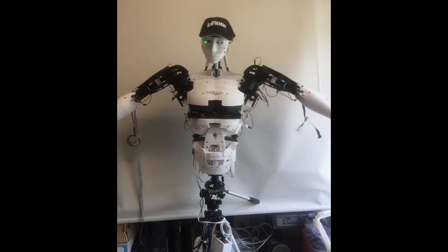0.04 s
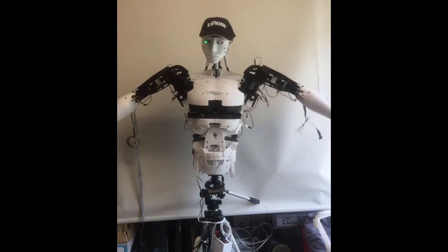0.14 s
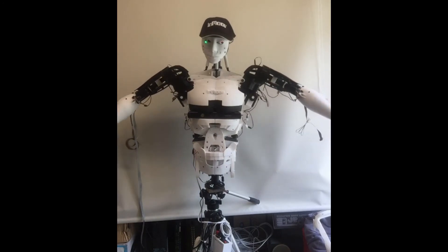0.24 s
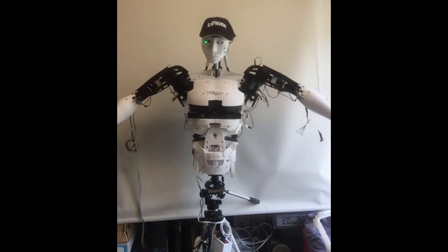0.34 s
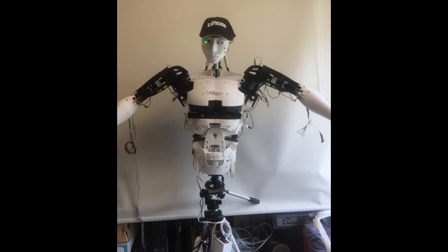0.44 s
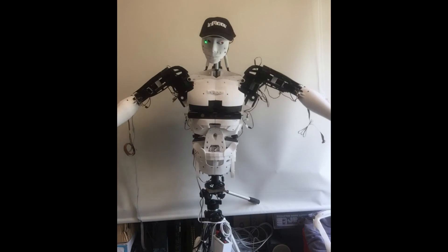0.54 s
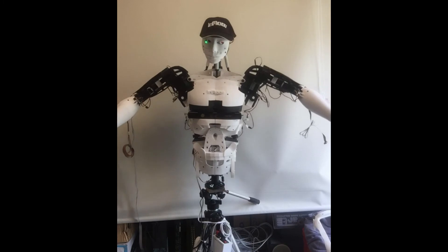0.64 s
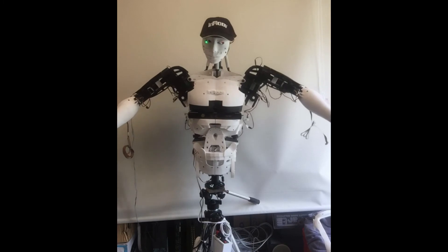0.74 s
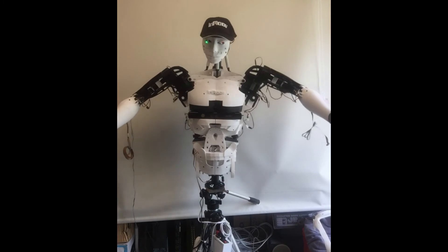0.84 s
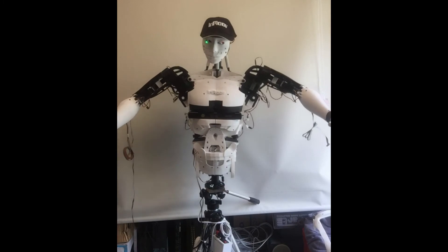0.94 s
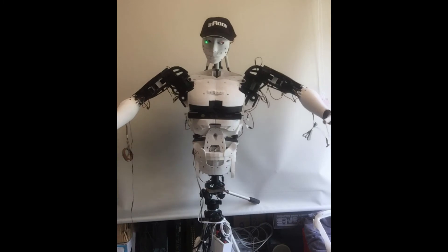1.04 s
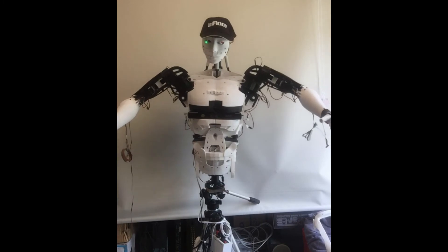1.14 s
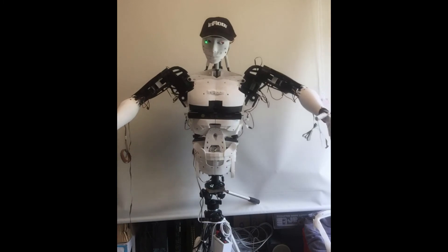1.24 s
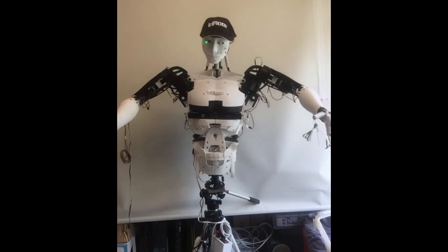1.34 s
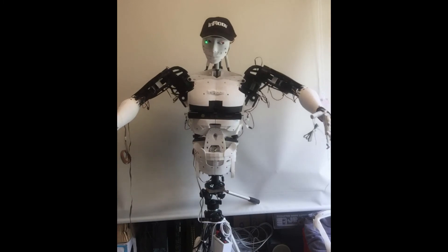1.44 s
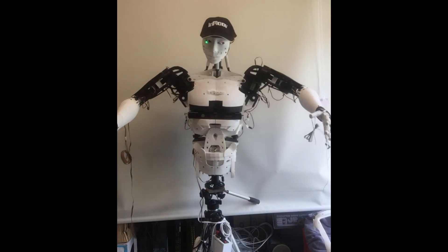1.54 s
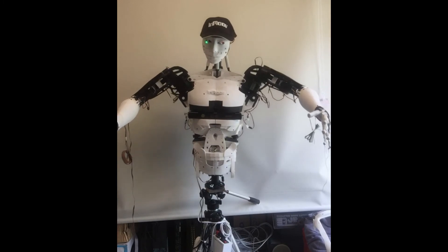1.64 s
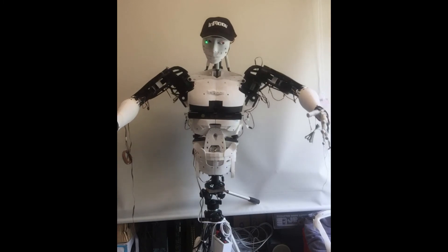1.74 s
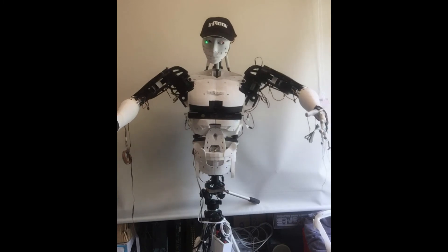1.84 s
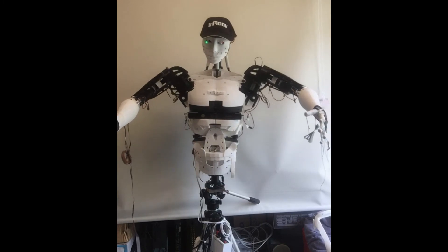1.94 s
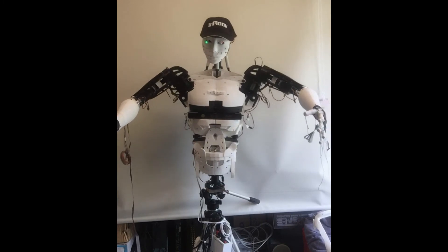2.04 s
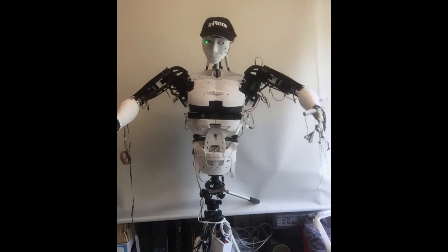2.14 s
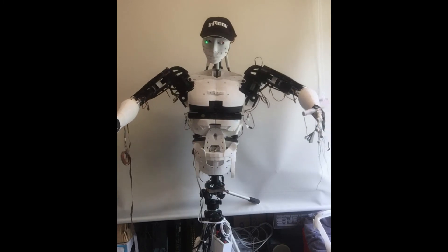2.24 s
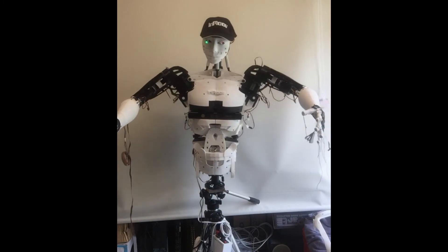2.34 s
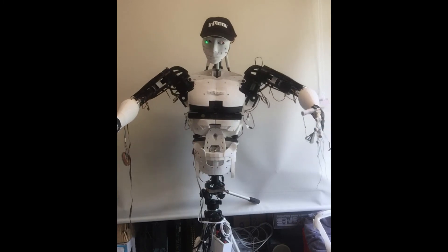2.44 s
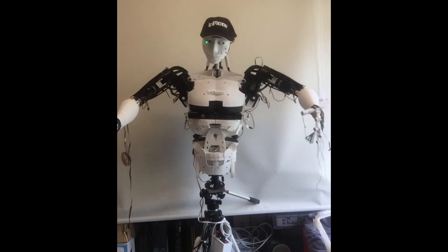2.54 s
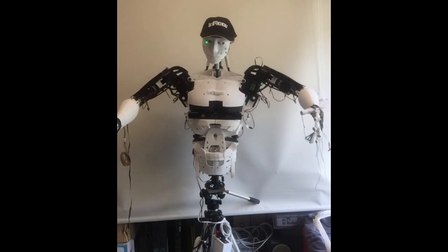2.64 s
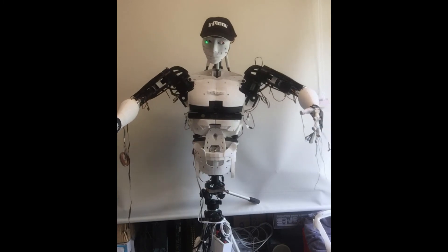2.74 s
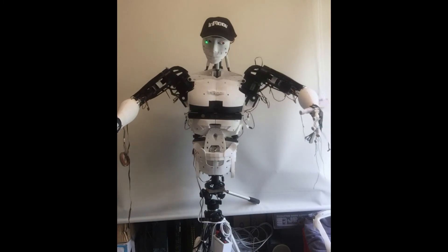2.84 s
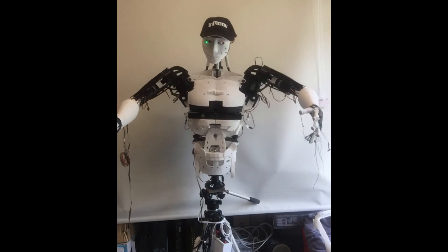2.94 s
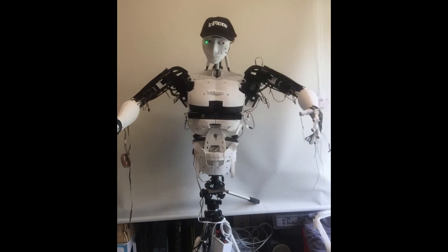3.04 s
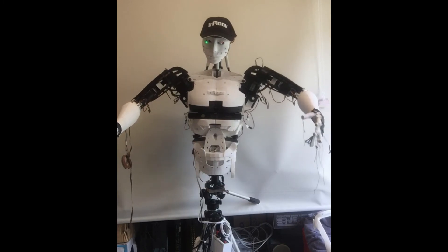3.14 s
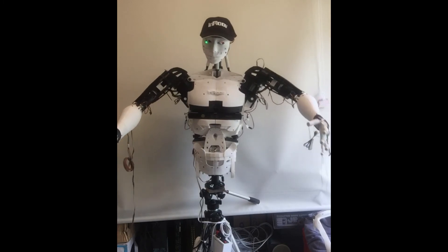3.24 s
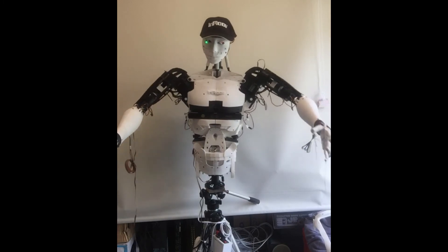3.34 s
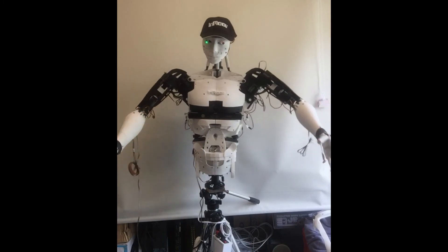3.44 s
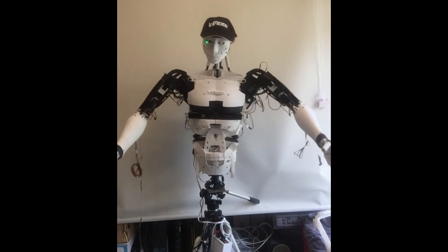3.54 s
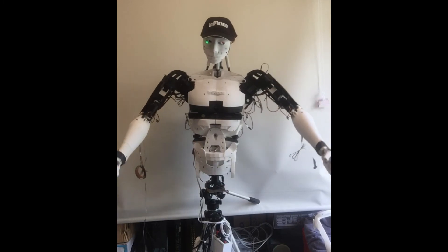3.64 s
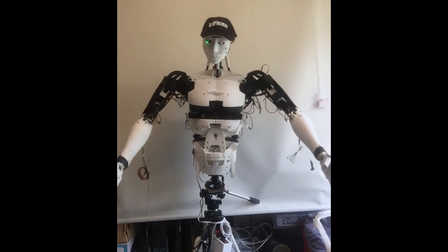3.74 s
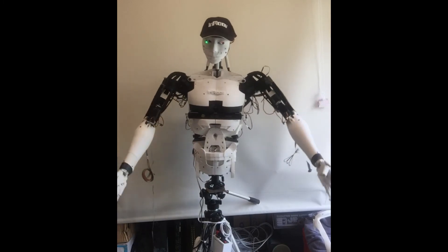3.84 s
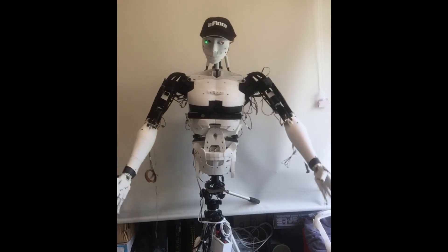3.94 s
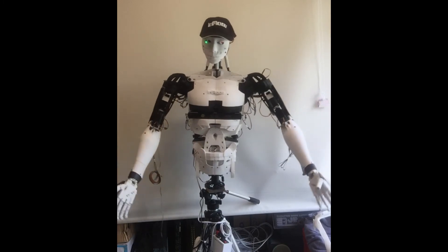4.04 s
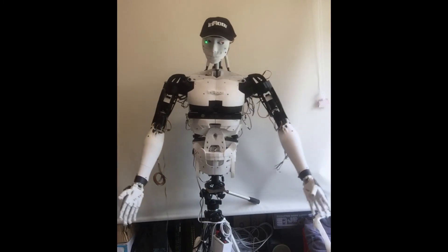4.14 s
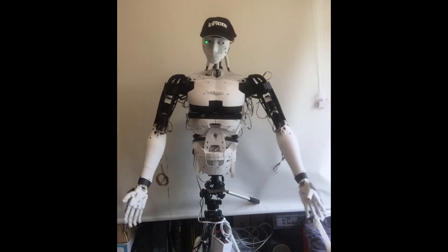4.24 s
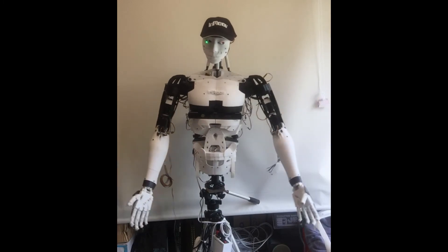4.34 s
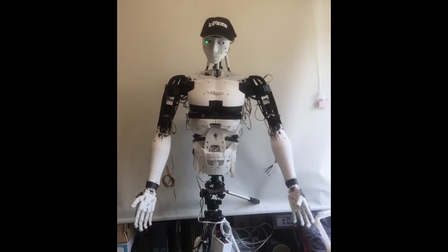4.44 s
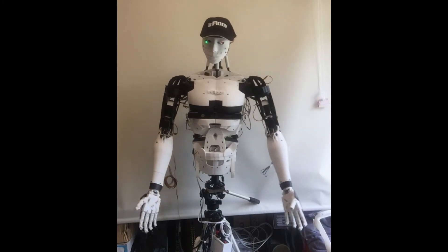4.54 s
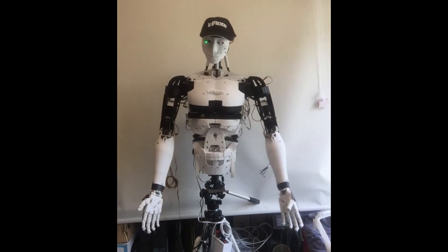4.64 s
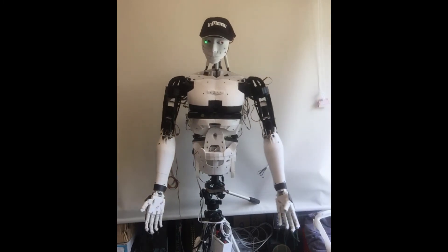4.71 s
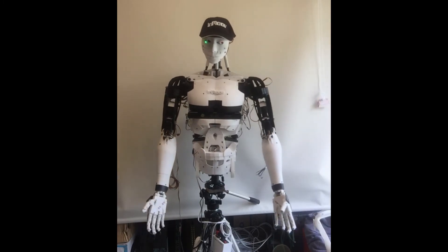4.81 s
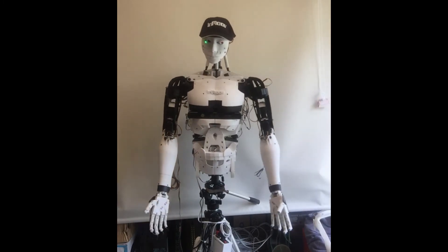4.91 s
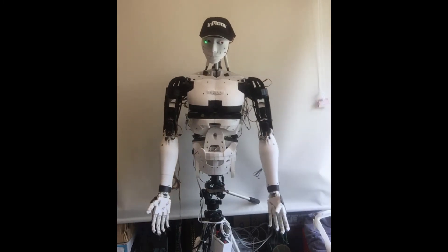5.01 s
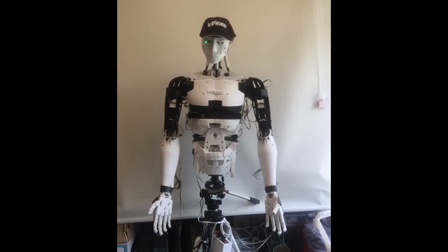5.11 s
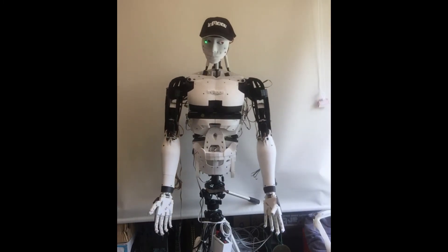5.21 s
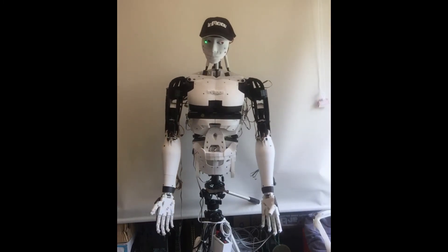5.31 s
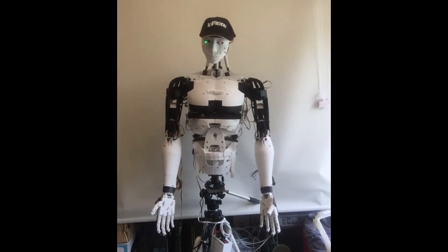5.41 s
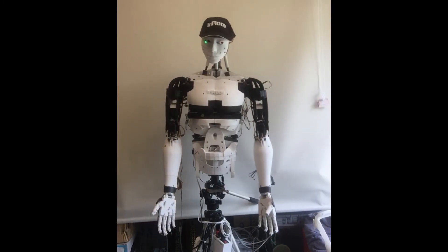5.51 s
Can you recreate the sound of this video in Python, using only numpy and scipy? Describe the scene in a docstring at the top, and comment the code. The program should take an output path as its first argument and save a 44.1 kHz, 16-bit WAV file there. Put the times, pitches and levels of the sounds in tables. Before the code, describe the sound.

A close, centred sound in a small, quiet room with a very short reverberation, low room tone and faint hiss. From the start, small geared servos are already whining, their buzzy stacked tones mixed with dry tooth rasp and hollow plastic rumble. A low groan of slipping plastic comes at about 0.2 s. From 0.5 to 2 s the whine slows, sags in pitch and fades, with brief thin whistles near 1 s. A faint fluttering buzz, about fifty pulses a second, swells and holds until 3 s, with two tiny clicks around 2.7 s. At about 3.1 s motors spin up quickly, louder and higher, with a bright squeal at 3.2 s and more clatter. Clicks snap at 3.5, 4.4 and 5.4 s, and a soft low thud lands near 3.7 s. From 4 s the whine glides down with small whistles, fading to room hiss by the end.

```python
"""In a small room, a plastic humanoid robot lifts its arms, holds them, then lowers them.
Geared servo motors whine up and down in pitch, sung as sine tones at multiples of the shaft speed.
Their teeth rasp in the hollow arm shells, made from random impacts passed through resonances.
Noise kicked at the control pulse rate makes the holding buzz; short noise bursts make the clicks.
A joint groans, motors and gears whistle briefly, the stand shakes and thuds once, and the air hisses."""
import sys
import numpy as np
from scipy import signal
from scipy.fft import rfft, irfft, next_fast_len
from scipy.io import wavfile

SR = 44100
rng = np.random.default_rng(int(sys.argv[2]) if len(sys.argv) > 2 else 0)


def wav_out(sig):
    """Save sig, one row per channel (or a flat mono array), as 16-bit PCM at SR to the path in sys.argv[1]."""
    wavfile.write(sys.argv[1], SR, np.round(np.clip(np.atleast_2d(sig).T, -1, 1) * 32767).astype(np.int16))


N = 245637
TIME = np.arange(N) / SR   # seconds
CONTROL_HZ = 49.7   # control pulses a second


def from_db(db):
    """Turn decibels into a plain multiplier."""
    return 10 ** (np.asarray(db) / 20)


def rms_one(x):
    """Scale a sound to an average power of one."""
    return x / np.sqrt(np.mean(x ** 2) + 1e-20)


def gain_at(spectrum, hz):
    """Read the gain of a spectrum between its points, evenly by musical interval."""
    f, db = np.transpose(spectrum)
    return from_db(np.interp(np.log(hz + 1), np.log(f), db))


def coloured(x, spectrum):
    """Shape a sound by a spectrum that falls steeply past its ends; rms 1."""
    size = next_fast_len(N)
    hz = np.arange(size // 2 + 1) * SR / size + 1
    lowest_hz, highest_hz = spectrum[0][0], spectrum[-1][0]
    skirts = np.minimum(1, np.minimum(hz / lowest_hz, highest_hz / hz)) ** 8
    shaped = rfft(x, size) * gain_at(spectrum, hz) * skirts
    return rms_one(irfft(shaped, size)[:N])


def noise():
    """White noise: all pitches equally strong."""
    return rng.standard_normal(N)


def drift(rate):
    """Smooth random wander of spread 1, slower than about `rate` Hz."""
    step = 40   # samples between the drawn points
    r = np.exp(-2 * step * np.pi * rate / SR)
    points = rng.standard_normal(N // step + 2002)
    slow = signal.lfilter([1], [1, -2 * r, r * r], points)[2000:]   # skip the filter's settling
    return np.interp(np.arange(N) / step, np.arange(len(slow)), rms_one(slow))


def resonate(x, hz, width_hz):
    """Ring one resonance, as a hollow part does when struck; rms 1."""
    b, a = signal.iirpeak(hz, hz / width_hz, fs=SR)
    return rms_one(signal.lfilter(b, a, x))


def impacts(per_s, spread_db):
    """Tooth impacts of either sign at random moments, their force uneven by spread_db."""
    struck = rng.random(N) < per_s / SR
    force = from_db(spread_db * np.clip(noise(), -2, 2))
    return struck * rng.choice([-1, 1], N) * force


def envelope(start, attack_s, end, release_s):
    """Rise in a straight line, hold, then die away exponentially."""
    return np.clip((TIME - start) / attack_s, 0, 1) * np.exp(-np.maximum(TIME - end, 0) / release_s)


def load_gain(load):
    """The load of one move as gain; it sets in quickly and dies away after the move."""
    attack_s, release_s = 0.061, 0.42
    s, db = np.transpose(load)
    return from_db(np.interp(TIME, s, db)) * envelope(s[0] - attack_s / 2, attack_s, s[-1], release_s)


def pace(servo):
    """Share of top speed: the motor spins up, then brakes smoothly into its goal."""
    start, spin_up_s, brake_at, brake_s = servo[:4]
    spin_up = 1 - np.exp(-np.maximum(TIME - start, 0) / spin_up_s)
    return spin_up / (1 + (np.maximum(TIME - brake_at, 0) / brake_s) ** 3)


def arm_pace(servos):
    """The arms move at the mean pace of their servos."""
    return np.mean([pace(servo) for servo in servos], axis=0)


# how well the servo cases pass on sound: (f/Hz, level/dB)
CASE = [(550, -42), (900, -9), (1500, -17.5), (2050, -1), (2380, -8.5), (2680, -9.5), (3050, -7),
        (3700, -4.5), (5600, -1), (6700, -0.5), (7750, -12), (9800, -14), (12500, -11), (16000, -39)]
WHINE_ONSET, WHINE_ONSET_WIDTH = 0.55, 0.077   # shares of top speed: the whine fades in around the first
PULSING = 0.74   # depth of the throb at the control pulse rate below full speed
SPIN_UP_DB = 9   # extra whine from the torque of spinning up, in proportion to the speed still to gain


def whine(servo, orders, jitter, hunting, flutter_db, speed_power, fade_db_per_s):
    """Gear mesh tones follow the shaft speed, flutter as the wheels turn and fade once the motor brakes."""
    brake_at, top_hz = servo[2], servo[4]
    share = pace(servo)
    throttled = np.tanh(7 * (1 - share))   # below full speed the controller hunts and the shaft is uneven
    unevenness = (jitter + hunting * throttled) * drift(57.2)
    speed = top_hz * share * (1 + unevenness)
    turn = 2 * np.pi * np.cumsum(speed) / SR
    tones = 0
    for multiple, level_db in orders:
        k = round(multiple)
        strength = from_db(level_db + flutter_db * drift(21.7)) * gain_at(CASE, k * speed)
        tones = tones + strength * np.sin(k * turn + rng.uniform(0, 2 * np.pi))
    singing = share ** speed_power / (1 + np.exp((WHINE_ONSET - share) / WHINE_ONSET_WIDTH))
    throb = 1 + PULSING * throttled * np.cos(2 * np.pi * (CONTROL_HZ * TIME + rng.random()))
    torque_db = np.where(TIME < brake_at, SPIN_UP_DB * (1 - share), -fade_db_per_s * (TIME - brake_at))
    return tones * singing * throb * from_db(torque_db)


# narrow rings of the gear housings, before the rasp setting: (f/Hz, width f/Hz, level/dB)
HOUSING = [(3804, 130, -52), (4020, 240, -31), (5600, 270, -20), (6140, 59, -44)]
# colour of teeth sliding on each other: (f/Hz, level/dB)
RASP = [(1590, -65), (2700, -13.5), (2860, -12), (3120, -3.5), (3750, 2.5), (4290, -1), (4800, -5),
        (5420, 2), (7200, -9.5), (9360, -16), (15800, -120)]
# colour of the bright tooth ticks, before their tilt: (f/Hz, level/dB)
TICKS = [(3650, -43), (6200, -11), (6820, -7.5), (7800, -1.5), (8520, -9), (10300, -10), (12700, -5.5),
         (16000, -20)]


def gears(speed, rumble_colour, rasp_db, tick_db, rumble_db, tick_tilt_db, tick_power, rumble_power):
    """Tooth impacts ring the housings; treble ticks and shell rumble grow as powers of the speed."""
    teeth = impacts(per_s=6000, spread_db=0.5) * from_db(0.59 * drift(7.1))
    rings = sum(from_db(db) * resonate(teeth, hz, width) for hz, width, db in HOUSING)
    sliding = coloured(impacts(per_s=9000, spread_db=-1) * from_db(1.3 * drift(19)), RASP)
    housing = (sliding + rings) * from_db(rasp_db)
    # the tilt is in dB an octave: loaded teeth tick duller
    tick_colour = [(hz, db + tick_tilt_db * np.log2(hz)) for hz, db in TICKS]
    ticks = coloured(teeth, tick_colour) * from_db(tick_db) * speed ** tick_power
    rumble = coloured(impacts(per_s=1100, spread_db=0), rumble_colour)
    shells = rumble * from_db(rumble_db) * speed ** rumble_power
    return housing + ticks + shells


def chatter(speed, count):
    """Lightly driven gears rattle in their play and ring at scattered pitches, most at half speed."""
    width_hz = 41
    rings = 0
    for hz in np.geomspace(3155, 6125, count):
        blows = impacts(per_s=2.2, spread_db=2) + 1e-12   # the tiny offset avoids pure silence
        rings = rings + resonate(resonate(blows, hz, width_hz), hz, width_hz)
    return rms_one(rings) * 4 * speed * (1 - speed)


# one row per lifting servo, already turning at time zero:
# (start t/s, spin-up t/s, braking begins t/s, braking to half speed t/s, top shaft f/Hz)
LIFT_SERVOS = [(-.45, .15, .27, 1.02, 473), (-.6, .15, .54, .72, 477)]
# mesh tones on the way up, relative to the load: (multiple of the shaft rate, level/dB)
LEAD_ORDERS = [(2, -17.5), (4, -19), (8, 1), (10, -6), (12, -9.5), (14, -10)]
LAG_ORDERS = [(2, -28), (4, -19), (8, -5), (12, -7), (16, -11)]
# rumble colour of the arm shells going up: (f/Hz, level/dB)
LIFT_RUMBLE = [(180, -62), (300, -54), (529, -16), (618, -28), (960, -10.5), (1520, -14.5), (1880, -6.5),
               (2310, -10), (3100, -5), (4030, -4), (6820, -120)]
# load on the gears going up, which scales all their sound: (t/s, level/dB)
LIFT_LOAD = [(0.0, -29.5), (0.03, -37), (0.14, -34), (1.04, -32.5), (1.53, -45.5), (2.04, -53.5),
             (2.05, -54.5)]


def lift():
    """Two servos raise the arms; whine and gear noise rise and fall with the load."""
    lead, lag = LIFT_SERVOS
    speed = arm_pace(LIFT_SERVOS)
    lead_tones = whine(lead, LEAD_ORDERS, jitter=0.0028, hunting=0.0038, flutter_db=2,
                       speed_power=3.6, fade_db_per_s=4.5)
    lag_tones = whine(lag, LAG_ORDERS, jitter=0.0021, hunting=0.0103, flutter_db=1.5,
                      speed_power=0.84, fade_db_per_s=4.5)
    teeth = gears(speed, LIFT_RUMBLE, rasp_db=-2.5, tick_db=-9.0, rumble_db=-15,
                  tick_tilt_db=-10.5, tick_power=1.56, rumble_power=1.0)
    rattle = from_db(-8.5) * chatter(speed, count=24)
    return (lead_tones + lag_tones + teeth + rattle) * load_gain(LIFT_LOAD)


# colour of the shaking stand: (f/Hz, level/dB)
SHAKE_COLOUR = [(45, -2), (68, 2), (95, 1.5), (135, -6)]
SHAKE_REST_DB, SHAKE_ADDED_DB = -79.5, -63   # shaking at rest, and what full speed adds to it
THUD_S, THUD_HZ, THUD_DB, THUD_WIDTH_S = 3.675, 66, -39, 0.026


def stand():
    """The stand shakes with the motion and gives one soft thud as the arms swing down."""
    age = TIME - THUD_S
    thud = from_db(THUD_DB) * np.exp(-(age / THUD_WIDTH_S) ** 2) * np.sin(2 * np.pi * THUD_HZ * age)
    moving = arm_pace(LIFT_SERVOS) + arm_pace(LOWER_SERVOS)
    shake = from_db(SHAKE_REST_DB) + from_db(SHAKE_ADDED_DB) * moving
    return thud + coloured(noise(), SHAKE_COLOUR) * shake


# colour of the low room tone: (f/Hz, level/dB)
ROOM_TONE = [(30, -24.5), (60, 3.5), (120, -4.5), (220, -8.5), (500, -15), (900, -22.5)]
# colour of the hiss: (f/Hz, level/dB)
HISS = [(400, -15), (1200, -1), (6000, -23.5), (15000, -19.5)]


def still_air():
    """The quiet room: steady low noise and a faint hiss."""
    return from_db(-67.5) * coloured(noise(), ROOM_TONE) + from_db(-67) * coloured(noise(), HISS)


def groan():
    """Under the lifted weight, plastic slips on plastic and rings one low resonance of the arm."""
    start_s, attack_s, decay_s = 0.23, 0.053, 0.25
    hz, width_hz = 848, 75
    slips = resonate(impacts(per_s=700, spread_db=-0.5), hz, width_hz)
    level = from_db(-55.5) * envelope(start_s, attack_s, start_s + attack_s, decay_s)
    return resonate(slips, hz, 2 * width_hz) * level


# short motor and gear whistles: (t/s, length t/s, f/Hz, glide in f/Hz per second, level/dB)
WHISTLES = [(0.772, 0.03, 5550, 1.5, -38), (0.959, 0.065, 3170, -3500, -42), (.97, 0.08, 6200, -7500, -35),
            (1.064, 0.045, 2038, -7, -49), (1.242, 0.15, 2660, 0, -53.5), (1.447, .16, 2176, 5, -59.5),
            (3.238, 0.09, 5280, 3500, -27.5), (3.916, 0.21, 5235, 0, -40.5),
            (4.218, .1, 7850, -1000, -39.5), (4.4, 0.16, 4530, 0, -45), (4.679, 0.069, 3620, -2500, -43.5),
            (4.86, 0.32, 5230, 7, -50.5), (5.062, .08, 1927, 0, -57)]


def whistles(attack_s, release_s, waver, flutter_db, throb_depth):
    """Short, unsteady motor and gear whistles; they throb at the control pulse rate and some slide."""
    tones = 0
    for s, length, hz, glide, db in WHISTLES:
        pitch = (hz + glide * np.clip(TIME - s, 0, length)) * (1 + waver * drift(42.8))
        level = from_db(db + flutter_db * drift(30)) * envelope(s, attack_s, s + length, release_s)
        tones = tones + level * np.sin(2 * np.pi * np.cumsum(pitch) / SR)
    return tones * (1 + throb_depth * np.cos(2 * np.pi * CONTROL_HZ * TIME))


# colour of the holding buzz: (f/Hz, level/dB)
HOLD_COLOUR = [(700, -42), (900, -24.5), (1060, 0), (1450, -42), (2600, -22.5), (3450, 2), (4050, 5.5),
               (4700, -5.5), (5600, -13), (9000, -26)]
# the buzz swells as the arms come to rest, eases off, and stops just before they drop
HOLD_FROM_S, HOLD_SWELL_S, HOLD_UNTIL_S, HOLD_RELEASE_S = 1.0, 0.79, 2.98, 0.014
HOLD_DB, HOLD_EASE_DB_PER_S = -51.5, 2


def holding_buzz(burst_s, uneven_db):
    """Each control pulse kicks the loaded motor against its gears."""
    since_pulse = TIME % (1 / CONTROL_HZ)
    kicks = np.exp(-since_pulse / burst_s) * from_db(uneven_db * drift(5.4))
    effort = from_db(HOLD_DB - HOLD_EASE_DB_PER_S * (TIME - HOLD_FROM_S))
    swell = envelope(HOLD_FROM_S, HOLD_SWELL_S, HOLD_UNTIL_S, HOLD_RELEASE_S)
    return coloured(noise() * kicks, HOLD_COLOUR) * effort * swell


# joint clicks: (t/s, snap level/dB, shell knock level/dB)
CLICKS = [(2.656, -57.5, -67), (2.774, -54, -67), (3.499, -34, -46), (4.369, -31.5, -35.5),
          (5.406, -40, -43.5), (5.470, -73, -55.5), (5.532, -64, -55.5)]
# colours of the bright snap and the duller knock: (f/Hz, level/dB)
SNAP = [(3000, 1), (6000, 8), (9000, -0.5), (13000, 5), (16000, -4)]
KNOCK = [(300, -16), (1000, 3.5), (1900, 13.5), (3000, 8.5), (4000, -24), (6200, -37), (9000, -13)]


def joints(snap_s, knock_s):
    """Play in the gears lets go with a bright snap and a duller knock, both dying away quickly."""
    snap_noise, knock_noise = coloured(noise(), SNAP), coloured(noise(), KNOCK)
    clicks = 0
    for s, snap_db, knock_db in CLICKS:
        age = np.maximum(TIME - s, 0)
        snap = snap_noise * from_db(snap_db) * np.exp(-age / snap_s)
        knock = knock_noise * from_db(knock_db) * np.exp(-age / knock_s)
        clicks = clicks + (TIME >= s) * (snap + knock)
    return clicks


# one row per lowering servo:
# (start t/s, spin-up t/s, braking begins t/s, braking to half speed t/s, top shaft f/Hz)
LOWER_SERVOS = [(2.894, .242, 3.915, 1.345, 661), (3.06, .19, 3.76, 1.22, 640),
                (3.031, .22, 3.95, 1.5, 653)]
# mesh tones on the way down, relative to the load: (multiple of the shaft rate, level/dB)
LOWER_LEAD_ORDERS = [(3, -12.5), (8, -5), (10, -14), (12, -8), (20, -8)]
LOWER_LAG_ORDERS = [(8, -6), (12, -8.5), (20, -6)]
SHOULDER_ORDERS = [(3, -6.5), (5, -8), (7, -9.5), (8, -21), (10, -8), (12, -13)]
# rumble colour of the arm shells going down: (f/Hz, level/dB)
LOWER_RUMBLE = [(160, -50), (280, -45), (349, -13.5), (445, -24.5), (522, -8), (672, -10.5), (773, -20.5),
                (955, -8.5), (1430, -10), (1760, -1.5), (1890, -7.5), (2050, -3), (2750, -10), (3100, -5.5),
                (4030, -13), (6820, -120)]
# load on the gears going down, which scales all their sound: (t/s, level/dB)
LOWER_LOAD = [(3.02, -46), (3.05, -44.5), (3.15, -33), (3.27, -32), (3.66, -32), (3.98, -31.5), (4.7, -37),
              (5.16, -46.5), (5.36, -51)]


def lower():
    """Three servos let the arms down, faster and with more clatter."""
    lead, lag, shoulder = LOWER_SERVOS
    speed = arm_pace(LOWER_SERVOS)
    lead_tones = whine(lead, LOWER_LEAD_ORDERS, jitter=0.002, hunting=0.00714, flutter_db=3,
                       speed_power=0.14, fade_db_per_s=8.5)
    lag_tones = whine(lag, LOWER_LAG_ORDERS, jitter=0.002, hunting=0.0078, flutter_db=4.0,
                      speed_power=0.2, fade_db_per_s=6)
    shoulder_tones = whine(shoulder, SHOULDER_ORDERS, jitter=0.0018, hunting=0.00766, flutter_db=2.0,
                           speed_power=2.8, fade_db_per_s=6)
    teeth = gears(speed, LOWER_RUMBLE, rasp_db=-3.0, tick_db=-4.5, rumble_db=-11,
                  tick_tilt_db=-4.9, tick_power=2.0, rumble_power=1.97)
    rattle = from_db(-8.0) * chatter(speed, count=24)
    return (lead_tones + lag_tones + shoulder_tones + teeth + rattle) * load_gain(LOWER_LOAD)


def room(x, wet_db, t60_s):
    """Direct sound plus a short blurred tail that falls 60 dB in t60_s, at about the same power."""
    age = TIME[:SR // 2]
    tail = rng.standard_normal(len(age)) * from_db(-60 * age / t60_s) * (age > 0.003)
    echo = signal.fftconvolve(x, tail / np.linalg.norm(tail))[:N]
    wet = from_db(wet_db)
    return (x + wet * echo) / np.hypot(1, wet)


def scene():
    """The robot in its room, the same in both channels."""
    whistling = whistles(attack_s=0.015, release_s=0.025, waver=0.007, flutter_db=4.5, throb_depth=0.45)
    buzz = holding_buzz(burst_s=0.011, uneven_db=2.4)
    clicks = joints(snap_s=0.0086, knock_s=0.013)
    robot = room(lift() + groan() + whistling + buzz + clicks + lower(), wet_db=-5, t60_s=0.2)
    return np.tile(robot + stand() + still_air(), (2, 1))


def record(dry):
    """Cut the top steeply above 15800 Hz."""
    low_pass = signal.ellip(10, 0.1, 80, 15800, fs=SR, output="sos")
    return signal.sosfilt(low_pass, dry)


dry = scene()
out = record(dry)
wav_out(out)
```